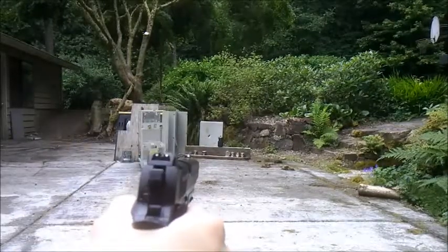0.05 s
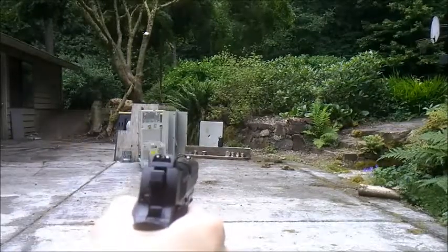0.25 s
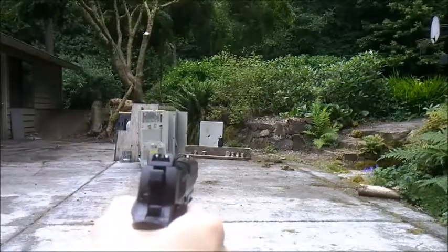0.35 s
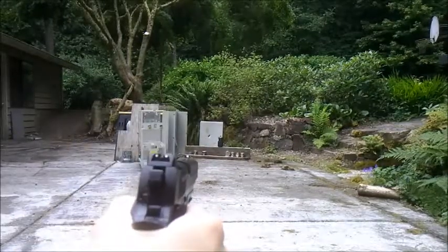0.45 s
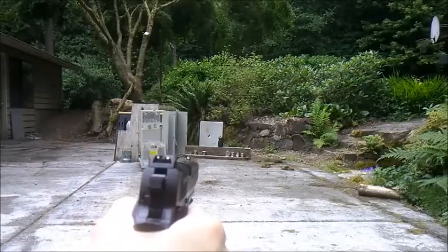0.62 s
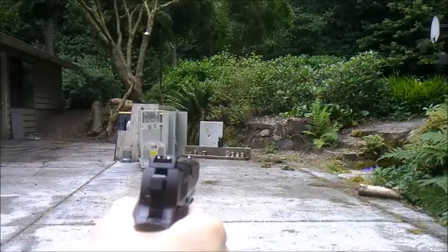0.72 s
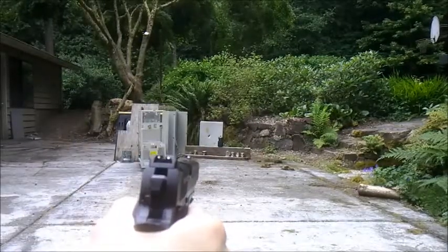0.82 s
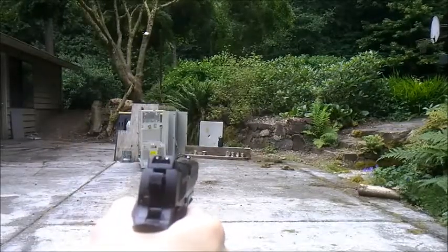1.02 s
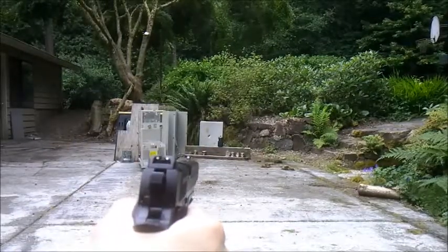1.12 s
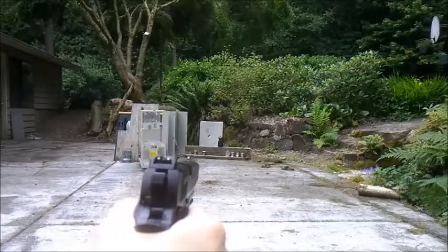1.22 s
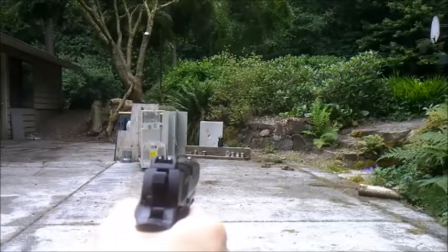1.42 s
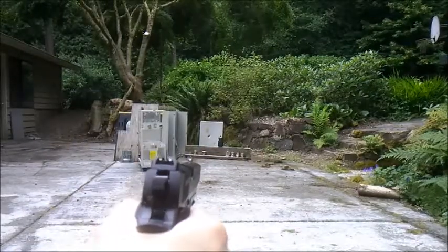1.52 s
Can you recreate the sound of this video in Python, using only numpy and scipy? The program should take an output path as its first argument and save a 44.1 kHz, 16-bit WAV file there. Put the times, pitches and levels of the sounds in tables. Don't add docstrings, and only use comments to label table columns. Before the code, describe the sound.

A gas pistol fires close to a small camera in a concrete yard. At 0.23 s a sharp, clipped pop with metallic slide clatter, a pellet cracking on ringing sheet metal at 0.32 s, and a short echo. The trigger clicks back at 0.52 s; faint rubs follow over a low distant engine drone, dipping quieter near 0.7 s. A second shot at 1.26 s, metal hit at 1.35 s, click at 1.51 s.

```python
import sys
import numpy as np
from scipy import signal
from scipy.fft import rfft, irfft
from scipy.io import wavfile
from scipy.ndimage import uniform_filter1d

SR = 44100
rng = np.random.default_rng(int(sys.argv[2]) if len(sys.argv) > 2 else 0)


def waveform_to_disk(signal):
    frames = np.transpose(np.atleast_2d(signal))
    scaled = np.clip(frames, -1, 1) * 32767
    samples = np.round(scaled).astype(np.int16)
    wavfile.write(sys.argv[1], SR, samples)


def invert_db(level):
    return 10 ** (np.asarray(level, dtype=float) / 20)


N = 68355
T = np.arange(N) / SR
NEAR_SPREAD = 0.76


def unit(x):
    return x / np.sqrt(np.mean(x ** 2))


def colour(x, table):
    hz, db = np.array(table, float).T
    log_grid = np.log(np.linspace(1, SR / 2, 2049))
    cepstrum = irfft(np.interp(log_grid, np.log(hz), db) * np.log(10) / 20)
    cepstrum[1:2048] *= 2
    cepstrum[2049:] = 0
    h = irfft(np.exp(rfft(cepstrum)))
    taps = np.atleast_2d(h) if x.ndim > 1 else h
    return signal.fftconvolve(x, taps, axes=-1)[..., :N], np.sqrt(np.sum(h ** 2))


def tint(x, table):
    y, power = colour(x, table)
    return y / power


def ring(x, hz, width):
    return signal.lfilter(*signal.iirpeak(min(hz, .45 * SR), hz / width, fs=SR), x)


def body(x, peaks):
    total = 0
    for k, (hz, width, db) in enumerate(peaks):
        total = total + (-1) ** k * invert_db(db) * ring(x, hz, width) / np.sqrt(width)
    return total * np.sqrt(SR / 8)


def noise(spread):
    mid, side = rng.standard_normal((2, N))
    side = signal.lfilter(*signal.butter(1, 900, "high", fs=SR), side)
    return (mid + spread * side * np.array([[1], [-1]])) / np.hypot(1, spread)


def fade(at, t60, rise=.0002):
    u = np.maximum(T - at, 0)
    return (1 - np.exp(-u / rise)) * invert_db(-60 * u / t60)


def walk(rate):
    k = int(SR / rate)
    return unit(uniform_filter1d(uniform_filter1d(rng.standard_normal(N), k), k))


def pistol():
    # start in seconds, blast in dB, gas flow in seconds, thump in dB, thump left over right in dB.
    shots = [
        (0.227, 1.5, 0.011, -8, 9),
        (1.2557, 8.5, 0.0057, -3, 12.5),
    ]
    # seconds after the shot, level in dB.
    slide = [
        (.012, -12),
        (.017, -16),
        (.025, -19.5),
        (0.031, -12.5),
    ]
    # frequency in Hz, level in dB per Hz.
    blast = [(88, -36), (150, -8), (759, -3.5), (1290, -11), (1530, -10.5), (3920, -4.5), (6260, -7.5),
             (9260, -6.5), (16000, -19)]
    # frequency in Hz, width in Hz, level in dB.
    barrel = [(1884, 270, -12), (3147, 11, -7), (3844, 47, -3), (5806, 30, -9.5), (6900, 150, -11.5),
              (7500, 33, -6.5), (8910, 19, -6.5), (9070, 33, -9), (10450, 34, -19), (11926, 340, -12.5)]
    # frequency in Hz, width in Hz, level in dB.
    frame_modes = [(600, 240, -1), (1100, 300, -3.5), (297, 150, -7)]
    hammer_lead_s, hammer_db, hammer_t60_s = 0.003334, -17.5, 0.017
    blast_t60_s, rattle_db, rattle_t60_s, grain_db = 0.033, -11, .18, 2.5
    jet_hz, jet_width_hz, jet_db, jet_lag_s = 3924, 700, 2.5, 0.0012
    thump_hz, thump_t60_s, thump_rise_s = 43, 0.13, 0.005
    drop_hz, drop_s, lag_rad = 59, .02, .6
    pop_db, pop_s = 2, 0.00059

    gas, jet, knocks, rattle, low = 0, 0, 0, 0, 0
    for at, db, flow, thump_db, pan_db in shots:
        u = np.maximum(T - at, 0)
        spent = invert_db(db - 60 * np.maximum(u - flow, 0) / blast_t60_s)
        gas = gas + spent * fade(at, 9)
        jet = jet + spent * fade(at + jet_lag_s, 9, rise=.001)
        knocks = knocks + invert_db(db) * sum(invert_db(k_db) * fade(at + lag, 0.014) for lag, k_db in slide)
        hammer = invert_db(hammer_db) * fade(at - hammer_lead_s, hammer_t60_s)
        rattle = rattle + invert_db(db) * (invert_db(rattle_db) * fade(at, rattle_t60_s) + hammer)
        turns = thump_hz * u + drop_hz * drop_s * (1 - np.exp(-u / drop_s))
        swing = np.sin(2 * np.pi * turns + np.array([[0], [lag_rad]]))
        swing = swing * fade(at, thump_t60_s, rise=thump_rise_s)
        pop = fade(at, 9) * (1 - 2 * u / pop_s) * np.exp(-u / pop_s)
        sides_db = thump_db + np.array([[pan_db], [-pan_db]]) / 2
        low = low + invert_db(sides_db) * swing + invert_db(db + pop_db) * pop

    grain = invert_db(grain_db * walk(1000))
    drive = (gas + (rattle + knocks) * grain) * noise(NEAR_SPREAD)
    jet = invert_db(jet_db) * jet * unit(ring(noise(NEAR_SPREAD), jet_hz, jet_width_hz))
    frame = invert_db(-12.5) * body(knocks * noise(0.33), frame_modes)
    return tint(drive, blast) + invert_db(-7) * body(drive, barrel) + jet + frame, low


def pellets():
    # start in seconds, ring in dB, crack in dB.
    hits = [
        (0.3201, -15.5, -13.5),
        (1.35, -11.5, -14.5),
    ]
    # frequency in Hz, level in dB, 60 dB fall in seconds.
    sheet = [
        [(1142.6, -18, 0.089), (1770, -5.5, 0.091), (1983, -6.5, 0.053), (2263, 0.5, 0.08), (3630, -19.5, 0.1),
         (4650, -0.5, 0.077), (7403, -11.5, 0.25), (8965, -4.5, 0.14), (11440, -9, 0.13), (11900, -9, 0.13)],
        [(755, -20.5, 0.14), (1150, -19, 0.096), (1770, -3, 0.11), (4770, -2.5, 0.044), (5680, -5, 0.063),
         (7400, -8, 0.15), (10400, -10, 0.065), (12160, -7, 0.14)],
    ]
    # frequency in Hz, level in dB per Hz.
    crack_tone = [(470, -84), (800, -36.5), (2260, -14.5), (3300, -14.5), (4570, -18), (11600, -13.5),
                  (16000, -15)]
    longest_t60_s, crack_t60_s, tick_db, tick_t60_s = .2, .11, 7, .012
    buzz_db_per_khz = 0.7648

    out = 0
    for (at, ring_db, crack_db), modes in zip(hits, sheet):
        for hz, db, t60 in modes:
            phase = rng.uniform(0, 2 * np.pi) + np.array([[0], [rng.normal(0, 0.98)]])
            level = invert_db(ring_db + db + buzz_db_per_khz * hz / 1e3 * walk(120))
            tone = np.sin(2 * np.pi * hz * T + phase)
            out = out + level * fade(at, min(t60, longest_t60_s)) * tone
        crack = fade(at, crack_t60_s) + invert_db(tick_db) * fade(at, tick_t60_s)
        out = out + invert_db(crack_db) * tint(crack * noise(0.61), crack_tone)
    return out


def trigger():
    # start in seconds, level in dB.
    resets = [
        (0.5181, -12.5),
        (0.5297, -28),
        (0.554, -38),
        (1.5095, -9),
        (1.5222, -22),
    ]
    # frequency in Hz, width in Hz, level in dB.
    plastic = [(775, 580, -6), (1168, 300, -1), (2200, 110, -7), (3070, 240, -2), (5510, 500, -3.5),
               (7560, 570, -9.5), (9960, 450, -14.5), (11380, 510, -9), (14500, 2100, -8)]
    rub_starts = [.13, .487, .63, .635, .67, .733, .83, .915, 1.06, 1.092, 1.15, 1.472]
    # length in seconds, level in dB, centre in Hz, width in Hz.
    rubs = [(0.0095, -60, 330, 300), (0.017, -37.5, 10270, 18000), (0.05, -53, 263, 51),
            (0.018, -52, 860, 310), (0.015, -58, 4900, 900), (0.027, -49.5, 980, 290),
            (0.052, -59, 232, 130), (.03, -63, 2100, 380), (0.026, -62.5, 3000, 640), (0.02, -49, 770, 114),
            (.015, -58, 1040, 300), (0.016, -29, 21000, 20000)]
    snap_t60_s, snap_rise_s, snap_air_db = 0.013, 0.00054, -11.5

    snaps = sum(invert_db(db) * fade(at, snap_t60_s, rise=snap_rise_s) for at, db in resets)
    drive = snaps * noise(0.68)
    out = tint(invert_db(3.5) * body(drive, plastic) + invert_db(snap_air_db) * drive, [(300, -24), (650, 0)])
    for at, (length, db, hz, width) in zip(rub_starts, rubs):
        swell = np.sin(np.pi * np.clip((T - at) / length, 0, 1))
        rough = invert_db(walk(390))
        out = out + invert_db(db) * swell * rough * unit(ring(ring(noise(.5), hz, width), hz, width))
    return out


def yard(x):
    # frequency in Hz, level in dB per Hz.
    wall_tone = [(120, -37), (200, -5), (867, -9), (1560, -15), (4350, -11.5), (11500, -2.5), (16000, -8.5)]
    # frequency in Hz, level in dB per Hz.
    tree_tone = [(200, -12), (1000, -5), (4000, -9), (7000, -6), (16000, -21)]
    walls_db, walls_t60_s, walls_gap_s = -17.5, .3, 0.013
    trees_db, trees_t60_s, trees_gap_s = -41.5, .9, 0.01

    walls = invert_db(walls_db) * fade(walls_gap_s, walls_t60_s, rise=.004) * tint(noise(.9), wall_tone)
    trees = invert_db(trees_db) * fade(trees_gap_s, trees_t60_s, rise=0.025) * tint(noise(.9), tree_tone)
    tail = (walls + trees) / np.sqrt(SR / 100)
    return signal.fftconvolve(tint(x, [(300, -18), (1500, -2.5)]), tail, axes=-1)[:, :N]


def background():
    # frequency in Hz, level in dB per Hz.
    air_tone = [(18, -35), (30, -10.5), (81, -6), (355, -27.5), (866, -24.5), (1500, -35), (3060, -37),
                (10500, -48.5), (16000, -63.5)]
    # frequency in Hz, width in Hz, level in dB.
    engine = [(69.9, 5, 0), (143, 42, -13)]
    # time in seconds, level in dB.
    drone_levels = [(0, -47), (.05, -45.5), (.11, -53), (.15, -51), (.2, -48), (.37, -45.5), (.45, -46.5),
                    (.52, -46.5), (.55, -56), (.66, -43), (.74, -56), (.8, -49), (.84, -43), (.98, -54),
                    (1.02, -44), (1.2, -57), (1.45, -47), (1.55, -49)]
    air_db, flicker_db, swell_db, spread_hz = -53.5, 2, 1.5, 1300

    air, swell = 0, walk(1.6)
    hz, db = np.array(air_tone).T
    for f in 35 * 2 ** np.arange(0, 9, .5):
        level_db = np.interp(np.log(f), np.log(hz), db) + swell_db * swell + flicker_db * walk(20)
        air = air + invert_db(level_db) * ring(noise(min(f / spread_hz, 1)), f, f / 3)
    (firing_hz, wander_hz, _), (over_hz, over_width_hz, over_db) = engine
    pitch = firing_hz + wander_hz / 2 * walk(36)
    firing = np.sqrt(2) * np.sin(2 * np.pi * np.cumsum(pitch) / SR)
    overtone = unit(ring(ring(noise(.2), over_hz, over_width_hz), over_hz, over_width_hz))
    drone = firing + invert_db(over_db) * overtone
    return invert_db(air_db) * unit(air) + invert_db(np.interp(T, *np.array(drone_levels).T)) * drone


def scene():
    shot, thump = pistol()
    loud, small = shot + pellets(), trigger()
    return loud + small + yard(loud + invert_db(-1.5) * small) + thump + background()


def top_cut(x):
    return signal.sosfilt(signal.butter(12, 16850, fs=SR, output="sos"), x)


def record(dry):
    # time in seconds, level in dB.
    gain_steps = [
        (0, -1.5),
        (.22, 0),
        (.675, -2),
        (.71, -11),
        (1.2, -14),
        (1.55, -7.5),
    ]
    # frequency in Hz, level in dB.
    right_port = [(100, 2), (3000, 0), (6000, -1.5), (9000, -10.5), (11000, -17), (12600, -31.5),
                  (14500, -14.5), (16000, -16)]
    clip_level, hiss_db, top_hz = 0.58, -77, 16000

    gain = invert_db(np.interp(T, *np.array(gain_steps).T))
    x = dry * gain
    x = x / (1 + np.abs(x / clip_level) ** 6) ** (1 / 6)
    x = np.array([x[0], colour(x[1], right_port)[0]])
    x = x + gain * invert_db(hiss_db) * rng.standard_normal((2, N))
    x = signal.sosfilt(signal.ellip(8, .2, 70, top_hz, fs=SR, output="sos"), x)
    return top_cut(x)


dry = scene()
out = record(dry)
waveform_to_disk(out)
```